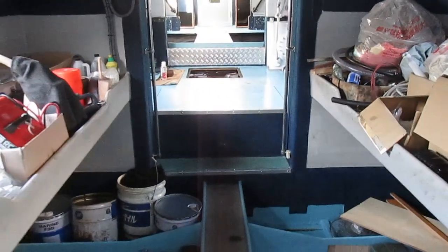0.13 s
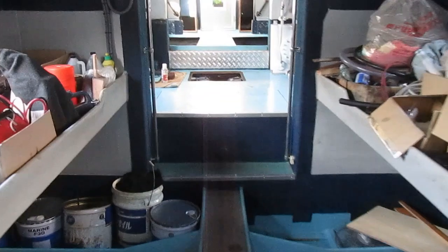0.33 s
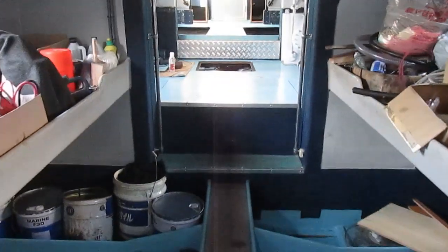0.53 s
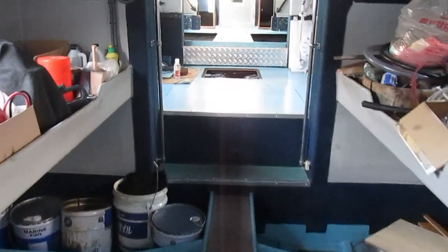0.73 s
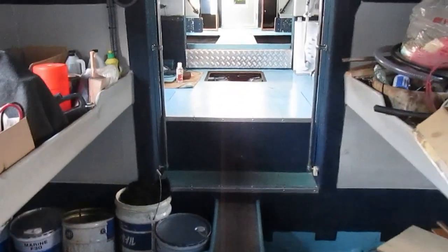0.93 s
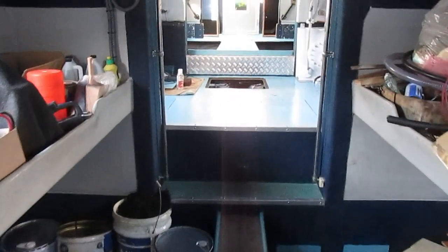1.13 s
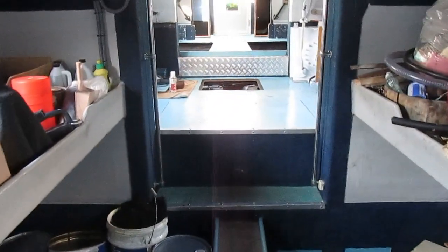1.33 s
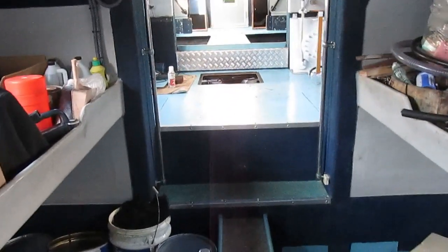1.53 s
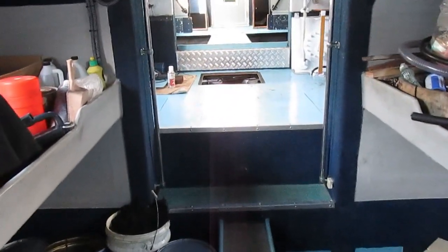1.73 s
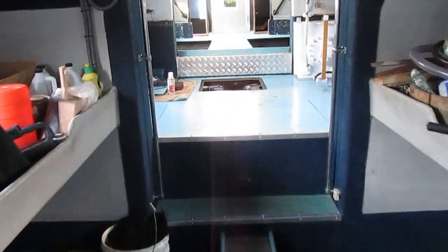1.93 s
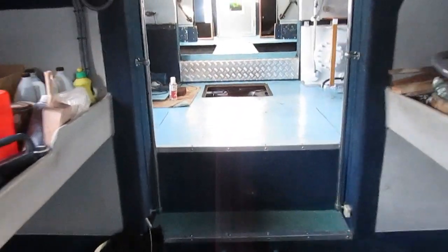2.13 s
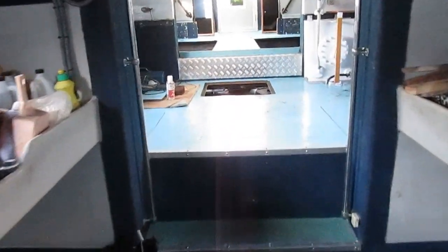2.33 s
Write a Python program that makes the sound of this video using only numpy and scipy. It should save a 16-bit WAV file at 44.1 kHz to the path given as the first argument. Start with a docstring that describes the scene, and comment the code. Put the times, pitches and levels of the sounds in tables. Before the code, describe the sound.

Someone steps heavily on hollow wooden flooring, with a hard clack just before, then moves more softly; a panel bumps, a plank clatters late. Close stereo microphone picks up tiny plastic ticks and lens whir.

```python
"""Footsteps on the loose floorboards of a small boat cabin: a heavy double thump, then softer steps.
Each blow rings a board and the hull, and filtered noise stands in for the dense reflections.
Loose wood knocks with ringing modes and rattling noise; hard things clack as short bright noise.
Close by, a camera body ticks (noise snaps and a dying tone) and its lens motor whirs (narrow noise).
Under it all lies a low room hush of coloured noise, with a faint whine for a while."""
import sys
import numpy as np
from scipy import signal
from scipy.fft import rfft, irfft
from scipy.io import wavfile
from scipy.ndimage import uniform_filter1d

SR = 44100
rng = np.random.default_rng(int(sys.argv[2]) if len(sys.argv) > 2 else 0)


def output_pcm(signal):
    """Save a mono or channel-first signal as 16-bit PCM at the path in sys.argv[1].

    Samples are clipped to [-1, 1] before scaling.
    """
    pcm = np.clip(np.atleast_2d(signal).T, -1, 1) * 32767
    wavfile.write(sys.argv[1], SR, np.round(pcm).astype(np.int16))


N = 103635
T = np.arange(32768) / SR  # time inside one sound, s


def amp(db):
    """Turns decibels into gain."""
    return 10 ** (np.asarray(db) / 20)


def read(points, hz):
    """Reads a table between its points, along a logarithmic frequency axis."""
    f, value = np.transpose(points)
    return np.interp(np.log(hz + 1), np.log(f + 1), value)


def evened(x, size=None):
    """Scales a sound so that its first samples (or all of them) have rms 1."""
    return x / np.sqrt(np.mean(x[..., :size] ** 2) + 1e-20)


def add(mix, s, sound):
    """Mixes a sound in at time s, cut off at the end of the mix."""
    start = max(round(s * SR), 0)
    part = mix[:, start:][:, :sound.shape[-1]]
    part += sound[..., :part.shape[1]]


def pan(db):
    """Left and right gains whose levels differ by db."""
    return amp([[db / 2], [-db / 2]])


def noise(colour, likeness, size):
    """Stereo noise: the colour shapes its spectrum, the likeness sets how alike left and right are."""
    hz = np.fft.rfftfreq(size, 1 / SR)
    mid = np.exp(2j * np.pi * rng.random(len(hz)))
    side = np.exp(2j * np.pi * rng.random(len(hz)))
    same = np.clip(read(likeness, hz), -1, 1)
    mid = mid * np.sqrt(1 + same)
    side = side * np.sqrt(1 - same)
    spectrum = np.array([mid + side, mid - side]) * amp(read(colour, hz))
    return evened(irfft(spectrum, size))


def fade(t60, hold=0):
    """Holds full level, then falls by 60 dB in every t60 seconds."""
    return amp(-60 * np.maximum(T - hold, 0) / t60)


def ring(hz, t60):
    """One mode: a sine that dies away."""
    return np.sin(2 * np.pi * hz * T) * fade(t60)


def flutter(length, size):
    """Random wavering of rms 1, smoothed over about size samples."""
    smooth = uniform_filter1d(rng.standard_normal(length), size=size)
    return evened(uniform_filter1d(smooth, size=size // 2))


def below(hz, edge_hz):
    """Gain of a smooth low-pass: half at the edge, steep above it."""
    return 1 / (1 + (hz / edge_hz) ** 10)


def band(x, edges_hz, kind, order=3):
    """Filters a sound forward in time."""
    return signal.sosfilt(signal.butter(order, edges_hz, kind, fs=SR, output="sos"), x)


# Blows on the boards: t/s, five band levels/dB (bass, low, body, knock, edge), swell/s, t60/s,
# the struck board's lower and upper f/Hz, their ring level/dB before the bands are levelled
BLOWS = [(.145, -72, -87, -62, -50, -69, 0.002, 0.068, 282, 1015, -14),
         (.3495, -21, -25.5, -23.5, -28.5, -33.5, .009, 0.12, 102.5, 480, -3),
         (0.3586, -19, -23.5, -17, -23.5, -40, 0.0019, 0.072, 96, 609, 3),
         (.3685, -45, -30, -27, -26, -53, 0.0023, .17, 279.5, 796, 0),
         (.428, -35, -30.5, -47, -47, -55, 0.0041, 0.046, 117, 198, 5),
         (.444, -33, -27, -23.5, -27, -42, 0.011, 0.14, 201.6, 441.8, -1),
         (.560, -41, -43.5, -50, -52.5, -54, 0.0035, .18, 111, 476, -14),
         (.622, -38, -37.5, -75, -54.5, -57.5, 0.015, 0.17, 127.2, 142.8, 1.5),
         (.742, -49, -49, -47.5, -49.5, -54, 0.0016, 0.12, 275.6, 503, -4),
         (1.0546, -28, -30, -32, -44, -54.5, 0.0018, 0.18, 164.5, 623, -11),
         (1.093, -29.5, -36.5, -38, -41.5, -59, 0.0042, 0.13, 99, 376.6, 8),
         (1.155, -37.5, -44.5, -54, -65, -63, 0.0043, 0.18, 87, 189, -9),
         (1.314, -42, -34.5, -37.5, -40.5, -57.5, 0.0072, 0.2, 194, 712, -1),
         (1.348, -37, -69, -57, -58, -71, 0.0025, 0.13, 80, 196, 14),
         (1.380, -50, -47, -43.5, -55, -72, 0.0015, 0.044, 150, 703, 3),
         (1.437, -40, -38, -43.5, -67, -67, .002, 0.22, 191.5, 331, -3.5),
         (1.520, -42.5, -38, -48.5, -63, -67, 0.0027, 0.14, 166, 328, -5.5),
         (1.594, -59, -66, -51.5, -50.5, -63, 0.0011, 0.098, 200, 1270, -6),
         (1.689, -39, -35, -41.5, -58, -84, 0.0024, 0.086, 187.5, 368, -3.5),
         (1.864, -47.5, -52, -60.5, -60, -69, 0.0039, 0.33, 93.2, 192.6, -15),
         (1.960, -50, -45.5, -57, -75, -78, 0.0036, 0.3, 86, 164, -8),
         (2.193, -41, -38, -39.5, -52, -55.5, 0.006, 0.11, 202, 554, -7.5),
         (2.228, -44, -40.5, -53.5, -59, -85, 0.0033, 0.26, 84.6, 160, -9.5),
         (2.315, -58, -51, -50, -49, -63, 0.001, 0.23, 310, 872, -6.5)]


def steps():
    """Heel, sole and shifting boards: every blow of the table in its turn."""
    out = np.zeros((2, N))
    for s, *levels_db, swell_s, t60, low_hz, high_hz, ring_db in BLOWS:
        add(out, s, blow(levels_db, swell_s, t60, low_hz, high_hz, ring_db))
    return out


# Edges of the five bands, bass to edge: f/Hz
BAND_EDGES = [28, 130, 300, 750, 1600, 16000]
# Left minus right in each band: level/dB
BAND_PAN_DB = [0, 1, -.7, -1, -1]
# Colour of the boards' reflections: f/Hz, level/dB per Hz
BOARDS = [(35, -28), (60, 1.5), (100, 3), (135, -6.5), (200, -1), (270, -0.5), (310, -8.5), (390, 3),
          (470, 4.5), (750, 1.5), (1200, -8), (1800, -14), (2400, -24.5), (3150, -24.5), (4200, -39.5),
          (6500, -38), (12000, -50)]
# Modes of the hull and the air in the cabin: f/Hz, level/dB relative to HULL_DB, longest t60/s
HULL = [(55.6, -2.5, 0.41), (92.6, 3, 0.24), (109.2, -3.5, 0.26), (159.6, -7, 0.4), (193.5, -0.5, 0.38),
        (274.6, -1, 0.36), (375.5, -0.5, 0.25), (439.5, -3.5, 0.31), (596, 0.5, 0.17), (656.6, -1, 0.25),
        (787, 3, 0.098), (1114, -1.5, 0.086), (1258, -3, 0.065)]
# Left-right likeness of sounds in the cabin: f/Hz, likeness (1 = the same, 0 = unrelated)
CABIN_SAME = [(60, 1), (180, 0.83), (350, 0.87), (700, 0.85), (1400, 0.54), (2500, 0)]
HULL_DB, HULL_SPREAD_DB, SCATTER_DB = -15, 1, -4.5  # hull level, its random spread, reflections
FOOT_DAMPING = 3.12  # under the foot the hull rings at most this many times the blow's t60
BOARD_RING = 1.23  # a board rings this many times the blow's t60
ONSET_S, HOLD_S, FIRST_SHARE = 0.00084, 0.0078, 0.44  # the first reflections pile up, then die
TAIL_DB, TAIL_T60 = -15.5, 0.6  # weaker, slower end of the reflections; t60 in s


def blow(levels_db, swell_s, t60, low_hz, high_hz, ring_db):
    """A blow rings one board and the hull amid dense reflections; its hardness balances the bands."""
    swell = np.minimum(FIRST_SHARE + (T / swell_s) ** 2, 1)
    decay = fade(t60, HOLD_S) + amp(TAIL_DB) * fade(TAIL_T60)

    modes = [(hz, ring_db, BOARD_RING * t60) for hz in (low_hz, high_hz)]
    for hz, db, ring_s in HULL:
        mode_db = HULL_DB + db + HULL_SPREAD_DB * rng.standard_normal()
        modes.append((hz, mode_db, min(ring_s, FOOT_DAMPING * t60)))
    rings = [(hz, amp(db) * rng.choice([-1, 1]) * ring(hz, ring_s)) for hz, db, ring_s in modes]

    scatter = rfft(noise(BOARDS, CABIN_SAME, len(T)))
    bins = np.fft.rfftfreq(len(T), 1 / SR)
    out = np.zeros((2, len(T)))
    for db, pan_db, lo, hi in zip(levels_db, BAND_PAN_DB, BAND_EDGES, BAND_EDGES[1:]):
        reflections = irfft(scatter * (below(bins, hi) - below(bins, lo)))
        band_rings = sum(x for hz, x in rings if lo <= hz < hi)
        part = reflections * decay * amp(SCATTER_DB) + band_rings
        onset = 1 - np.exp(-(T / (ONSET_S + .5 / hi)) ** 2)  # low bands start more slowly
        # the table's level holds over the first 34 ms
        out += amp(db) * pan(pan_db) * evened(part * swell * onset, size=1500)
    return out


# One knock each on a hollow panel and a plank: t/s, level/dB, swell/s (its sign does not matter),
# rattle level/dB before the knock is levelled, rattle t60/s
HOLLOW_KNOCK = (.9038, -27, -0.4, -6, 0.12)
PLANK_KNOCK = (2.0632, -25.5, -1, -0.5, 0.2256)
# What each rings with: f/Hz, relative level/dB, t60/s
HOLLOW_MODES = [(198.2, -2.5, 0.2), (191, -13, 0.57), (380, -8, 0.11), (439.7, 1, .18), (548, -21, 0.38),
                (606, -10, 0.076), (688, -14, 0.19), (810, -11, .16), (896, -19, .13)]
PLANK_MODES = [(234.2, -7.5, 0.37), (421, -12.5, 0.45), (661, -0.5, .19), (763, -9, .22), (862, -11, 0.3),
               (900, -8, 0.21), (1004, -8, .21), (1132, -10.5, 0.25), (1366, -12.5, 0.25),
               (1732, -15.5, .18)]
# Colour of their rattles: f/Hz, level/dB per Hz
HOLLOW_RATTLE = [(40, -25), (150, -2.5), (280, -8), (500, 0.5), (820, 0), (1100, -18), (9000, -74)]
PLANK_RATTLE = [(80, -24), (220, -5), (300, -11), (480, 2.5), (800, -1), (1300, -9.5), (1800, -15),
                (2400, -23), (3200, -19), (4100, -29), (7200, -35), (9500, -45), (15000, -50)]
PLANK_PAN_DB = -0.5  # left minus right


def knocks():
    """A hollow panel is bumped; later a loose plank clatters."""
    out = np.zeros((2, N))
    hollow_s, *hollow_settings = HOLLOW_KNOCK
    add(out, hollow_s, panel(HOLLOW_MODES, HOLLOW_RATTLE, *hollow_settings))
    plank_s, *plank_settings = PLANK_KNOCK
    add(out, plank_s, panel(PLANK_MODES, PLANK_RATTLE, *plank_settings) * pan(PLANK_PAN_DB))
    return out


PANEL_ONSET_S, PANEL_TAIL_DB = 0.00089, -15.5


def panel(modes, colour, db, swell_s, rattle_db, rattle_t60):
    """A loose wooden part rings with its own modes and rattles briefly against its neighbours."""
    rings = sum(amp(mode_db) * rng.choice([-1, 1]) * ring(hz, t60) for hz, mode_db, t60 in modes)
    decay = fade(rattle_t60, HOLD_S) + amp(PANEL_TAIL_DB) * fade(TAIL_T60)
    rattle = noise(colour, CABIN_SAME, len(T)) * decay
    swell = np.minimum(FIRST_SHARE + (T / swell_s) ** 2, 1)
    onset = 1 - np.exp(-(T / PANEL_ONSET_S) ** 2)
    return amp(db) * evened((rings + amp(rattle_db) * rattle) * swell * onset, size=1500)


# Hard things clacking and shifting nearby: t/s, level/dB, hold/s, t60/s, sheen of the treble/dB
CLACKS = [(.197, -47.5, 0.011, 0.17, 2.5), (0.2234, -16.5, 0.012, 0.14, -0.5),
          (0.299, -38, 0.015, 0.17, 4.5), (0.427, -50.5, 0.011, 0.5, 5), (0.504, -46.5, 0.0086, .08, 4),
          (0.691, -55.5, 0.013, 0.11, 7), (1.379, -60, .03, .12, 6)]
# Colour of the clacks: f/Hz, level/dB per Hz
CLACK_COLOUR = [(71, -42), (120, -13), (222, -33), (385, -3.5), (530, -10), (892, -2), (1140, -9),
                (1720, -8), (2110, -10), (6630, -4), (10200, -14), (14700, -15), (16000, -26)]
# Left minus right: f/Hz, level/dB
CLACK_BALANCE = [(180, 1), (550, 1), (1650, -2.3), (4970, 0.62)]
# Left-right likeness of close sounds: f/Hz, likeness (below 0 = opposed)
CLACK_SAME = [(300, 0.88), (1000, 0.81), (2200, 0.18), (4500, -0.036), (8000, 0.33), (13000, -0.33)]
CLACK_SHEEN_HZ, CLACK_ROUGH_DB = 7540, 1  # sheen acts above this; rms wavering of the level
CLACK_RING_DB, CLACK_RING_T60, CLACK_RING_HZ = -5.5, 0.49, 1360  # added low part; t60 in s


def clacks():
    """Bright cracks scattered unevenly by the close walls, with a low part that has its own decay."""
    out = np.zeros((2, N))
    hz = np.fft.rfftfreq(len(T), 1 / SR)
    balance = read(CLACK_BALANCE, hz)
    for s, db, hold, t60, sheen_db in CLACKS:
        sheen = sheen_db * (1 - below(hz, CLACK_SHEEN_HZ))
        tone = amp([sheen + balance / 2, sheen - balance / 2])
        crack = irfft(rfft(noise(CLACK_COLOUR, CLACK_SAME, len(T))) * tone)
        roughness = amp(CLACK_ROUGH_DB * flutter(len(T), size=160))
        crack = crack * fade(t60, hold) * roughness
        low = band(noise(CLACK_COLOUR, CABIN_SAME, len(T)), CLACK_RING_HZ, "lowpass")
        low = amp(CLACK_RING_DB) * low * fade(CLACK_RING_T60)
        onset = np.minimum(T / ONSET_S, 1)
        add(out, s, amp(db) * (crack + low) * onset)
    return out


# Ticks of the camera body: t/s, snap level/dB, knock level/dB, left minus right/dB,
# sheen of the treble/dB
TICKS = [(0.016, -46, -39.5, -14.5, 5), (0.5183, -26.5, -38, -8.5, -9), (.803, -42, -33.5, -11.5, 3),
         (.969, -51, -43, -17, -13), (1.019, -46, -45, -12, -2), (2.005, -43, -48, 6, 3),
         (2.0076, -42.5, -30.5, -16.5, 9.5), (2.1352, -40.5, -34, -12, 0)]
# Colour of the snaps: f/Hz, level/dB per Hz
TICK_COLOUR = [(300, -21), (1400, -19), (2400, -2), (3400, -0.5), (4400, -6.5), (6800, 3.5), (8000, -4),
               (9300, -4), (12500, -9), (15500, -11)]
TICK_T60, TICK_SHEEN_HZ = 0.0075, 10700  # decay of the snap in s; sheen acts above this
TICK_KNOCK_HZ, TICK_KNOCK_T60 = 1326, 0.012  # t60 in s


def ticks():
    """Dry plastic snaps right at the microphone, each with a short knock of the casing."""
    out = np.zeros((2, N))
    hz = np.fft.rfftfreq(len(T), 1 / SR)
    knock = ring(TICK_KNOCK_HZ, TICK_KNOCK_T60)
    for s, snap_db, knock_db, pan_db, sheen_db in TICKS:
        sheen = amp(sheen_db * (1 - below(hz, TICK_SHEEN_HZ)))
        snap = irfft(rfft(noise(TICK_COLOUR, CLACK_SAME, len(T))) * sheen)
        snap = evened(snap * fade(TICK_T60), size=64)
        add(out, s, (amp(snap_db) * snap + amp(knock_db) * knock) * pan(pan_db))
    return out


# Runs of the lens motor: t/s, length/s, level/dB
WHIRS = [(.010, 0.043, -50.5), (0.141, 0.032, -51), (0.491, 0.03, -53), (0.553, 0.079, -46.5),
         (0.596, 0.2, -58.5), (1.367, 0.07, -55), (1.646, 0.033, -60.5), (2.192, 0.058, -56.5),
         (2.288, 0.064, -48)]
# Its resonances: f/Hz before each run's speed shift, width/Hz, relative level/dB
LENS = [(5780, 130, -9), (8580, 170, -12), (11340, 110, -6.5), (14020, 90, -17)]
LENS_SKIRT_HZ, LENS_SKIRT_DB = 800, -4  # width of the hiss; its level against the whistle
LENS_SPEED_SPREAD, FLUTTER_DB = 0.0033, 3  # random share of the speed; rms flutter of each resonance


def resonance(centre_hz, width_hz):
    """Noise gathered around one frequency: its power is halved half a width away."""
    hz = np.linspace(1, SR / 2, 4096)
    level_db = -10 * np.log10(1 + (2 * (hz - centre_hz) / width_hz) ** 2)
    return noise(np.c_[hz, level_db], CLACK_SAME, len(T))


def lens():
    """Short swelling runs of a tiny motor: thin whistles that flutter, each on a skirt of hiss."""
    out = np.zeros((2, N))
    for s, length, run_db in WHIRS:
        arch = np.maximum(np.sin(np.pi * np.minimum(T / length, 1)), 0)
        gate = amp(run_db) * arch ** 0.54
        speed = 1 + LENS_SPEED_SPREAD * rng.standard_normal()
        for f, width, db in LENS:
            whistle = resonance(f * speed, width)
            skirt = resonance(f * speed, LENS_SKIRT_HZ)
            level = amp(db + FLUTTER_DB * flutter(len(T), size=900))
            add(out, s, gate * level * (whistle + amp(LENS_SKIRT_DB) * skirt))
    return out


# Colour of the cabin air: f/Hz, level/dB per Hz
HUSH = [(20, -22), (64, -1), (301, -10), (430, -6), (1400, -16.5), (2220, -25), (4250, -27.5),
        (6380, -25.5), (10400, -35.5), (14400, -34.5), (16000, -46)]
# Loudness of the air over time: t/s, level/dB
HUSH_LEVEL = [(0, -51.5), (.8, -50), (1.3, -49), (1.8, -53), (2.35, -50.5)]
# Left-right likeness of the air: f/Hz, likeness (1 = the same, 0 = unrelated)
HUSH_SAME = [(60, 0.69), (500, 0.72), (1500, 0.48), (4000, 0.061)]
# Loudness of the faint whine over time: t/s, level/dB
WHINE_LEVEL = [(1.45, -70), (1.65, -62), (2.0, -61.5), (2.2, -82)]
WHINE_HZ, WHINE_WIDTH_HZ = 1432, 180


def hush():
    """The cabin air as noise of slowly changing level, with a faint narrow whine."""
    t = np.arange(N) / SR
    air = noise(HUSH, HUSH_SAME, N) * amp(np.interp(t, *np.transpose(HUSH_LEVEL)))
    edges_hz = [WHINE_HZ - WHINE_WIDTH_HZ / 2, WHINE_HZ + WHINE_WIDTH_HZ / 2]
    whine = evened(band(noise(HUSH, HUSH_SAME, N), edges_hz, "bandpass", order=2))
    return air + whine * amp(np.interp(t, *np.transpose(WHINE_LEVEL)))


def scene():
    """All sources added together at the microphone."""
    return steps() + knocks() + clacks() + ticks() + lens() + hush()


LOW_CUT_HZ, EDGE_HZ = 40, 16000


def record(dry):
    """The recorder's low cut and upper band limit."""
    low_cut = band(dry, LOW_CUT_HZ, "highpass", order=2)
    limit = signal.firwin(255, EDGE_HZ, window=("kaiser", 9), fs=SR)
    return signal.oaconvolve(low_cut, limit[None], "same")


dry = scene()
out = record(dry)
output_pcm(out)
```